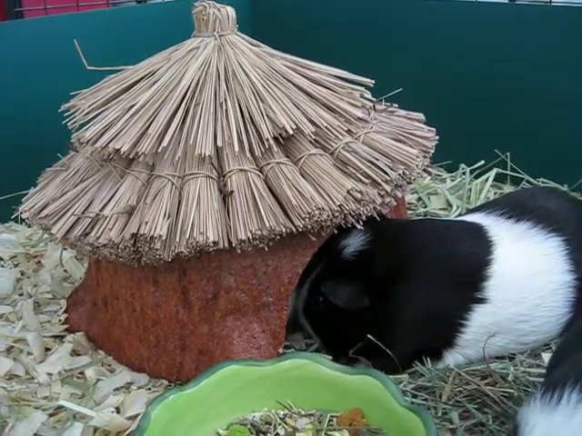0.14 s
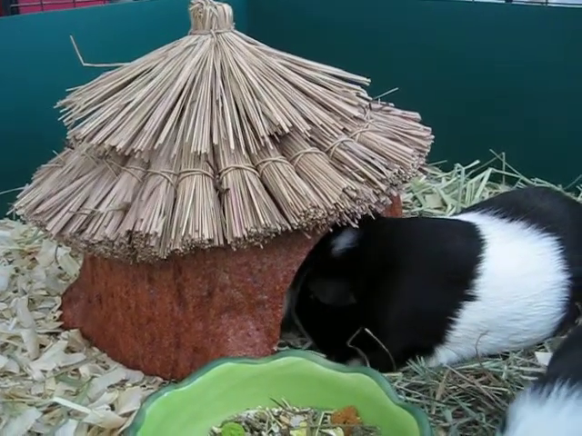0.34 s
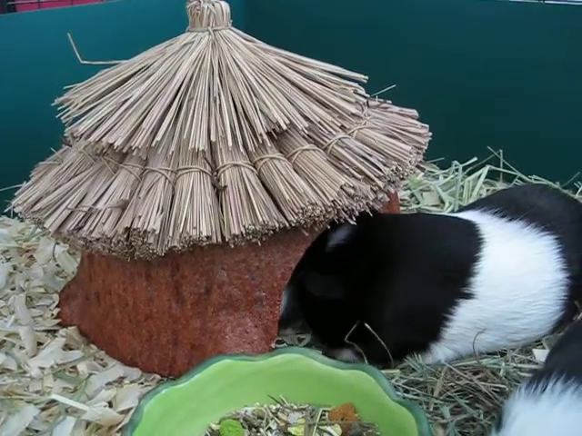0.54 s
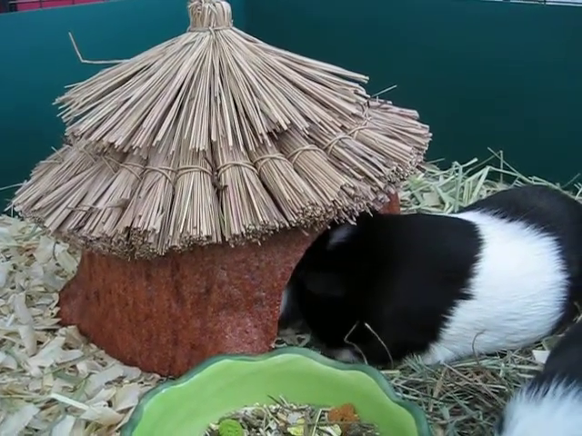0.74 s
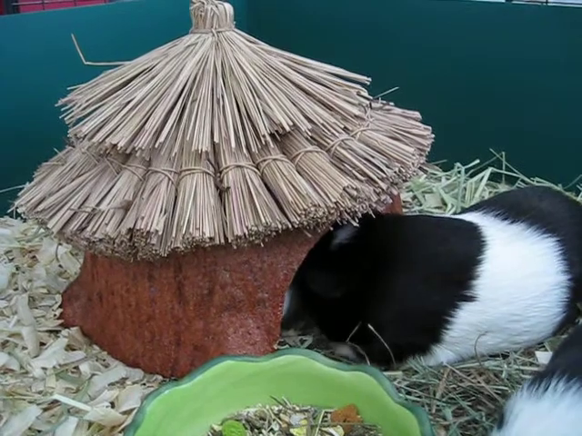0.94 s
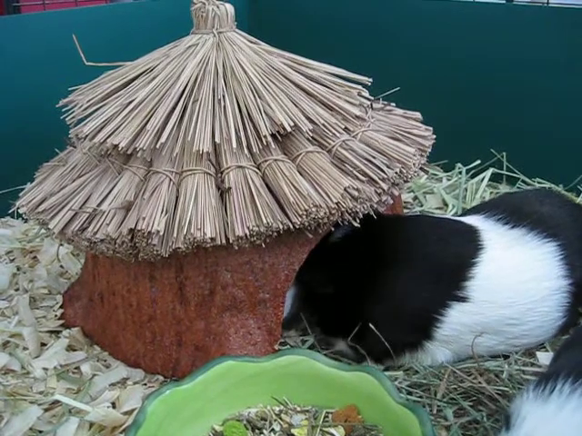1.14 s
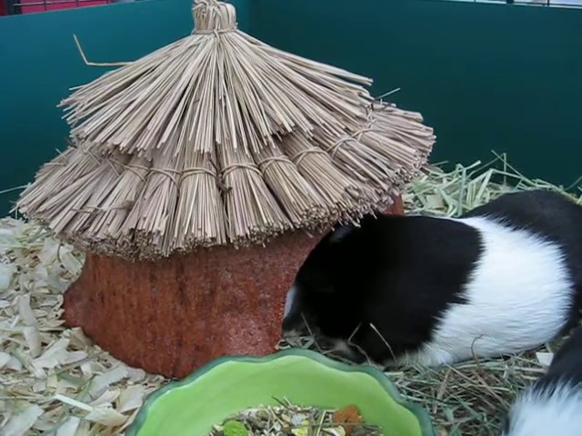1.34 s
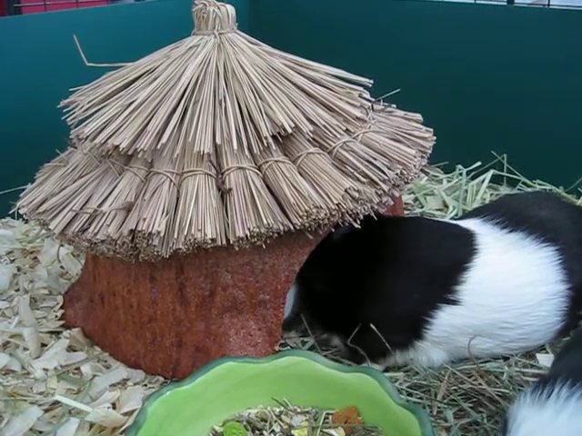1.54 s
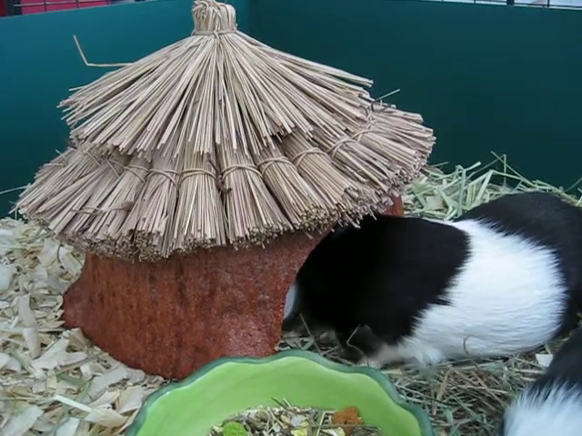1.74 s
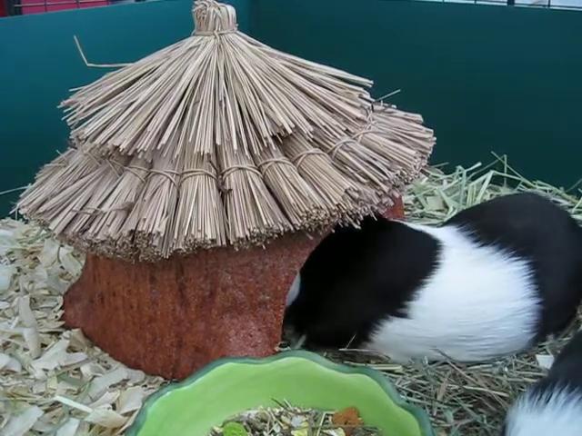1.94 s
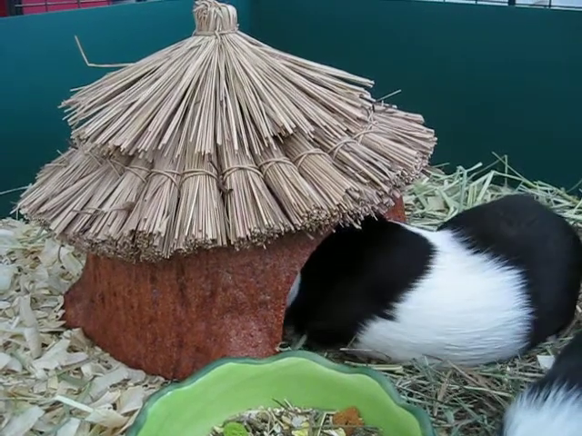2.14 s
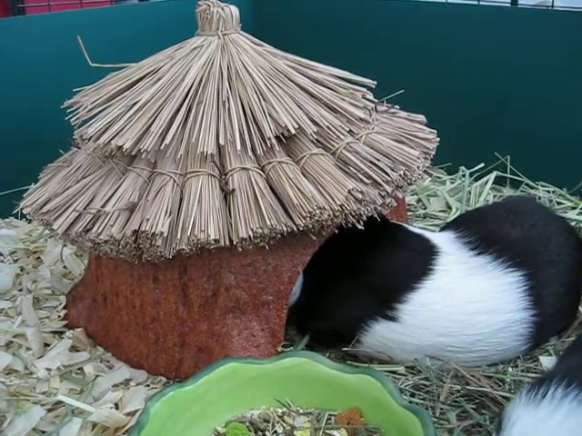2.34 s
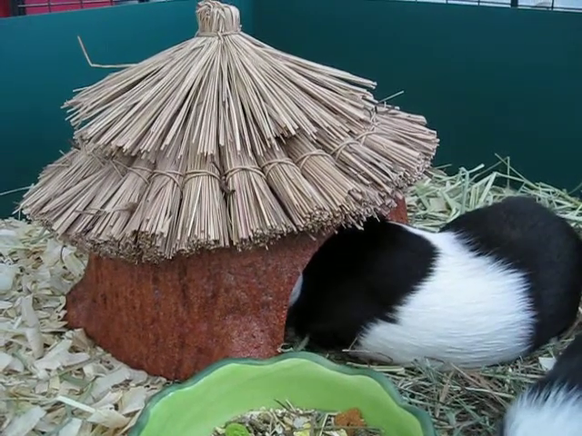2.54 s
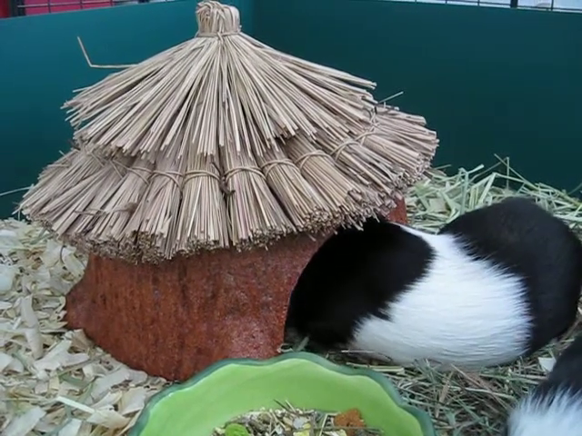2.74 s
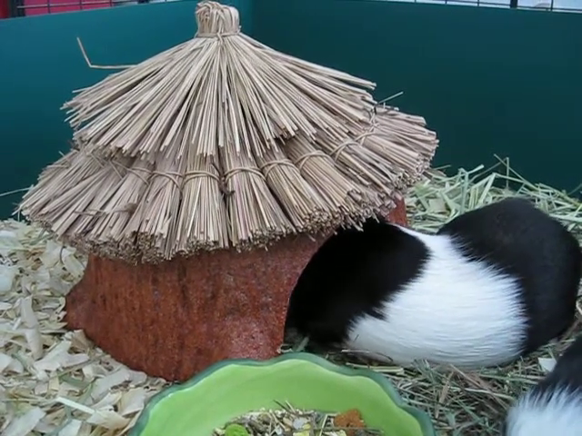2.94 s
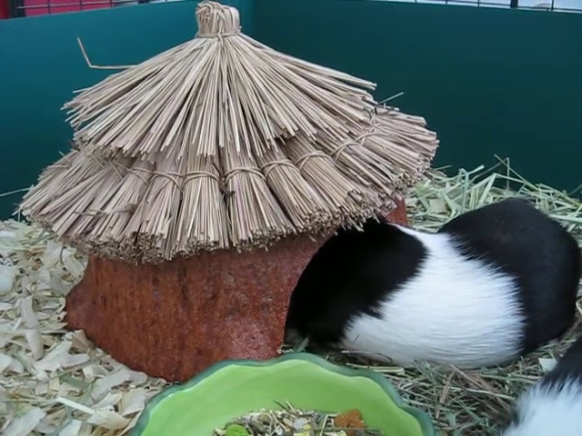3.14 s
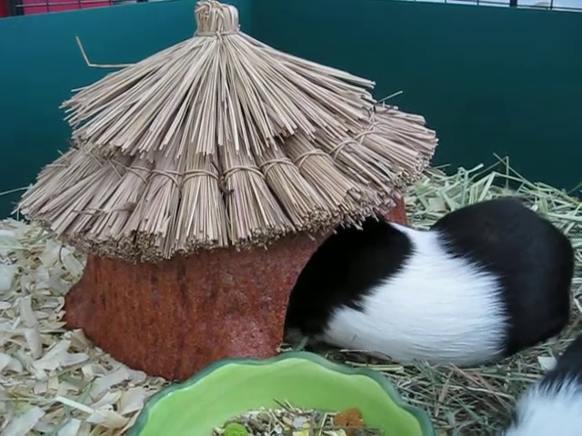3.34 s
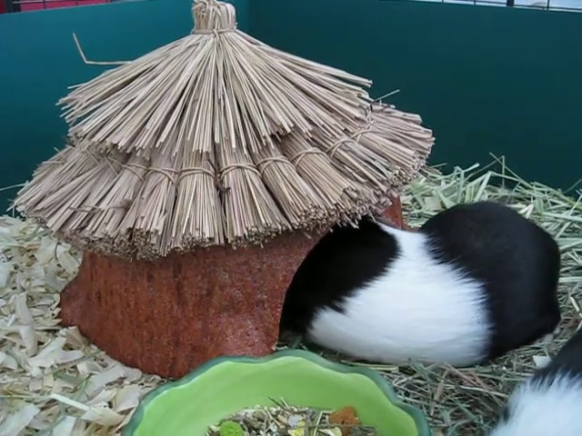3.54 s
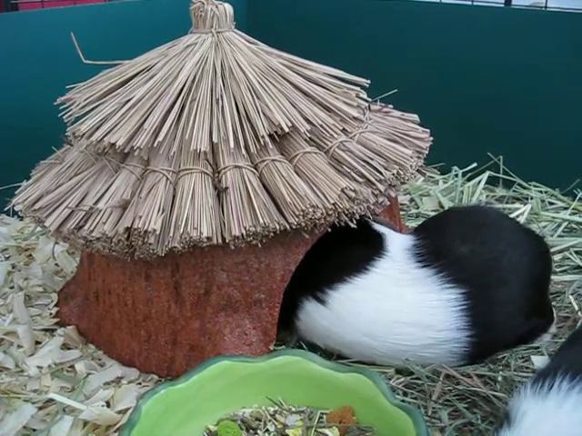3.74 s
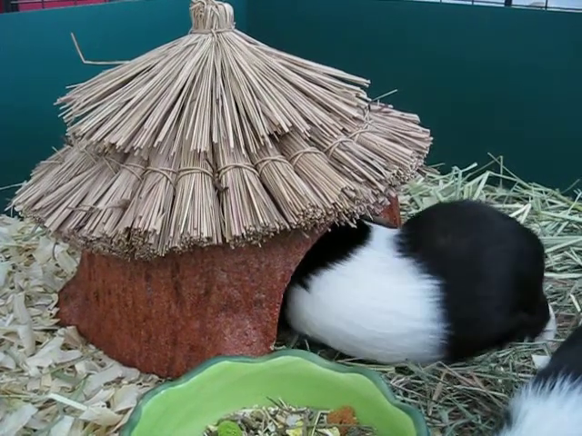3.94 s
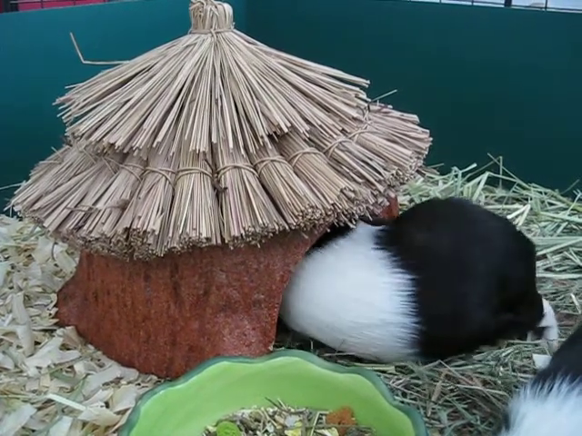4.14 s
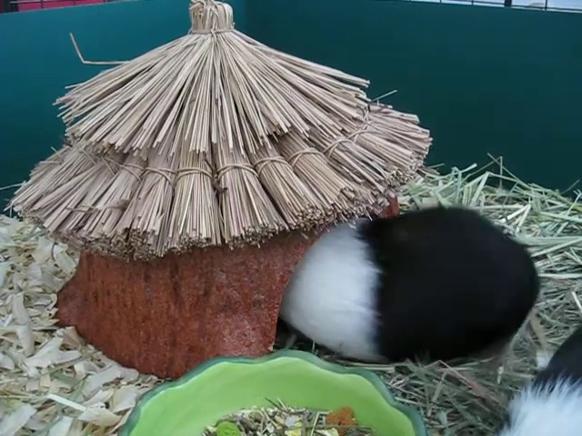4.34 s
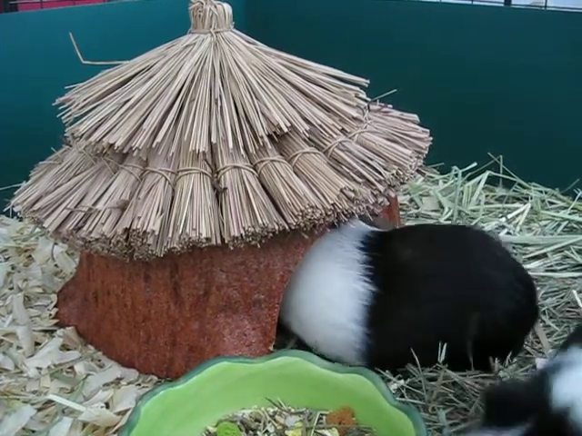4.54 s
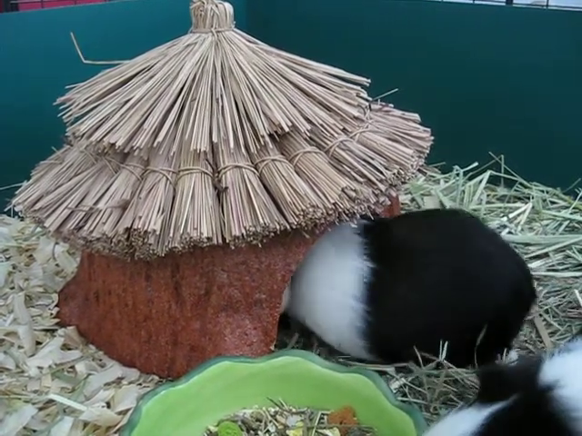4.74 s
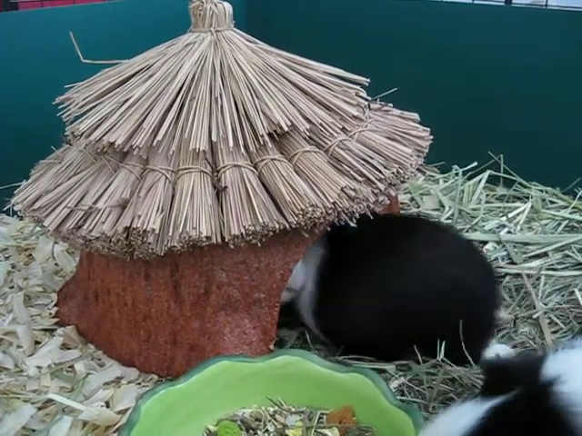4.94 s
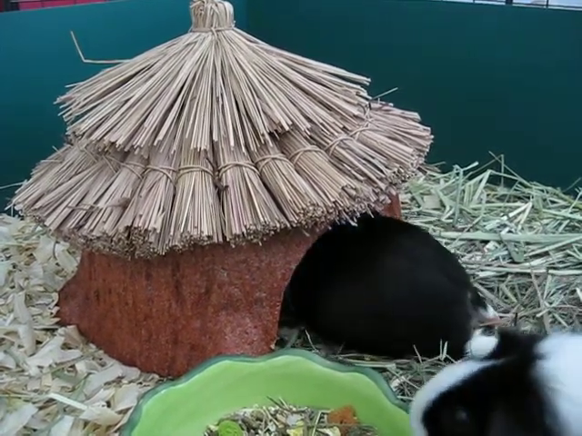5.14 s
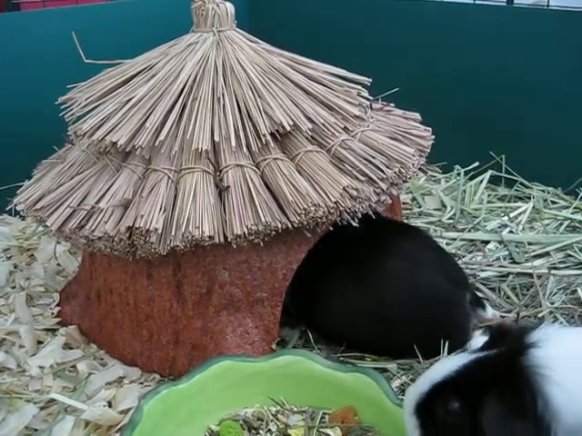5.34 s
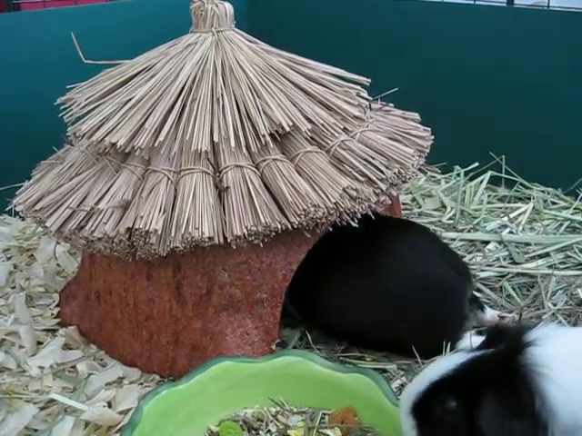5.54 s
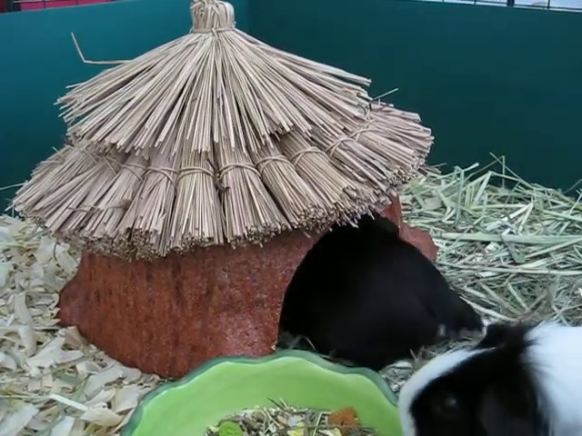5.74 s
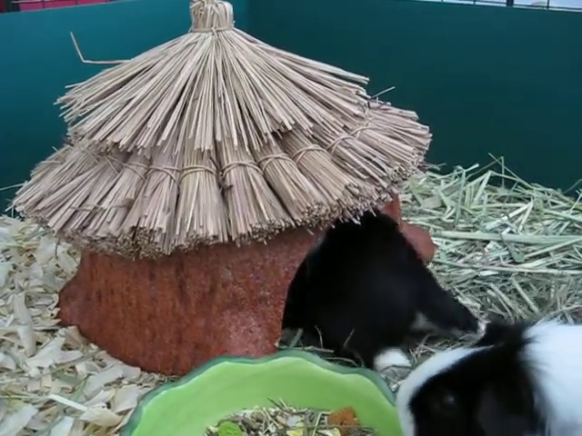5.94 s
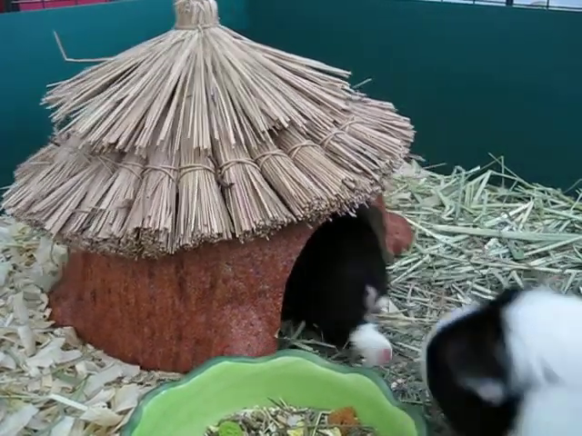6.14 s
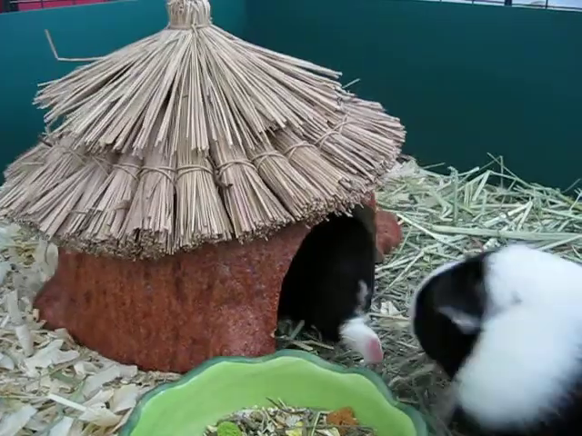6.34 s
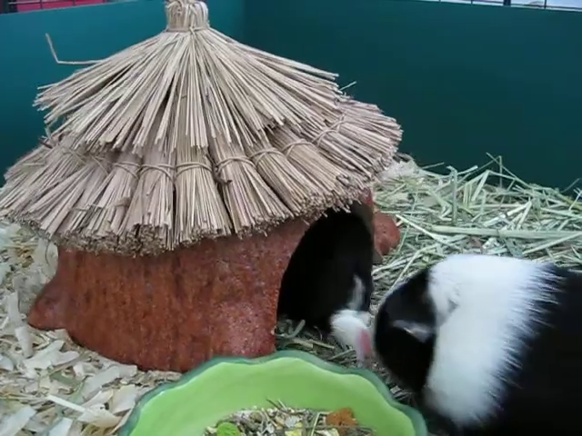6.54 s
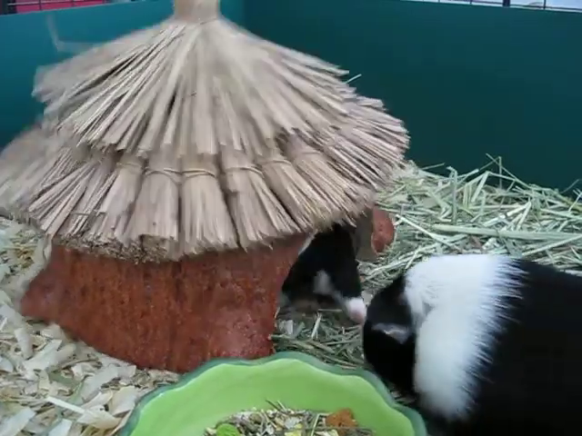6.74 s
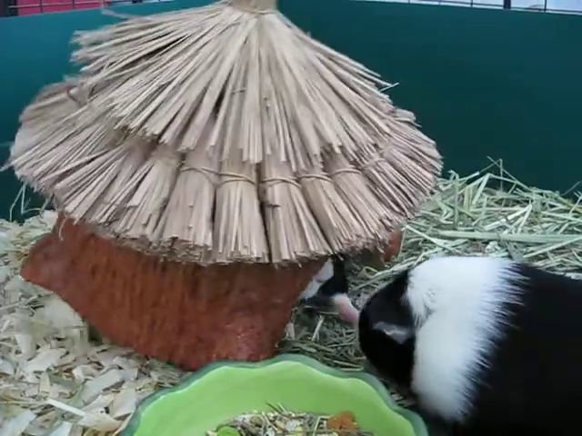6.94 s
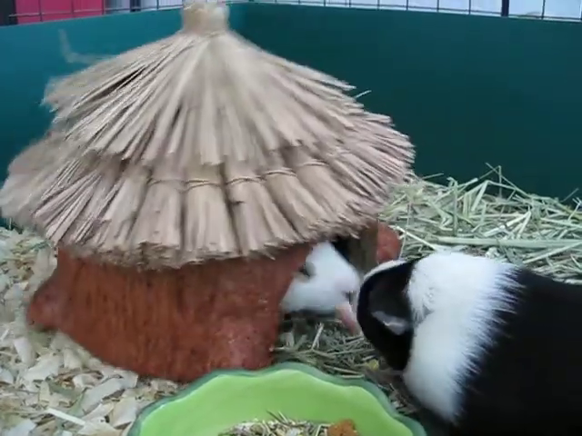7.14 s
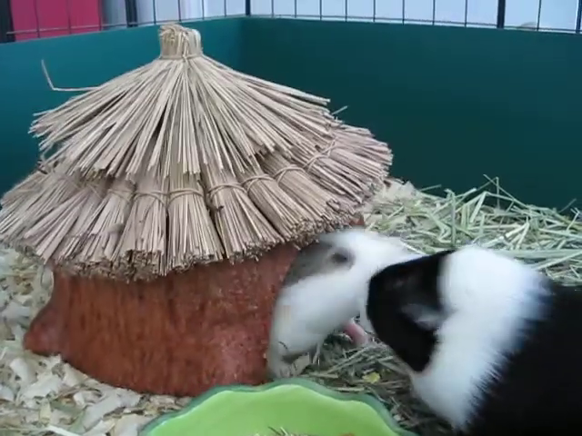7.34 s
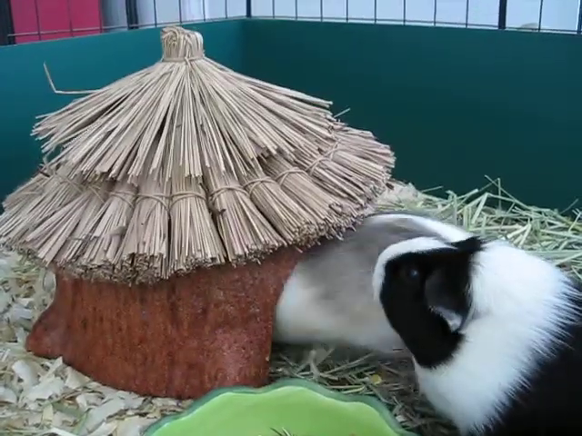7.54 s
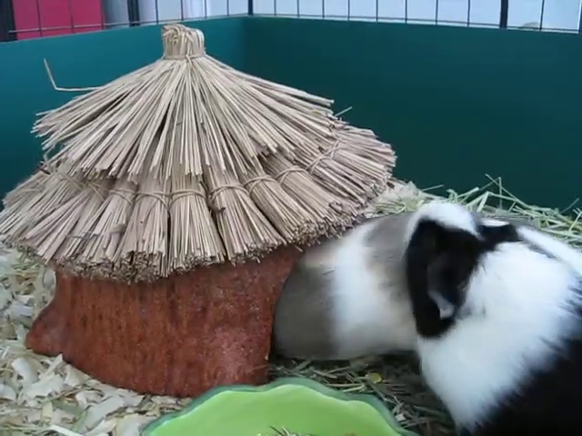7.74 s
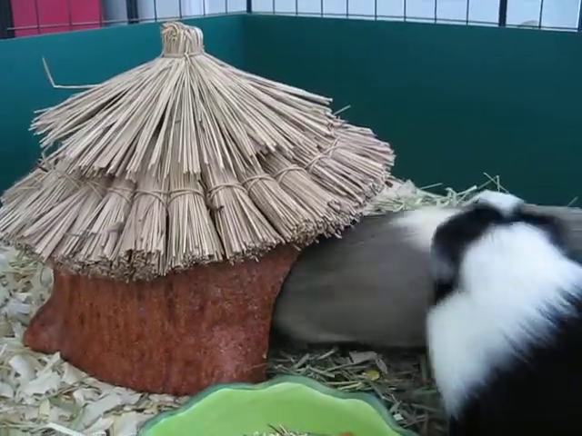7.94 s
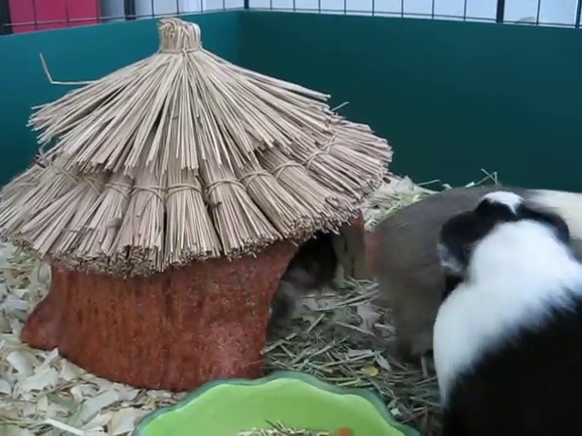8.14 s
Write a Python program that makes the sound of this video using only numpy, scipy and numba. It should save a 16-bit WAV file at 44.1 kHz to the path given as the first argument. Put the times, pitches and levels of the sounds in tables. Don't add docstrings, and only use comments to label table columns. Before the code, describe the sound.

Guinea pigs chut softly in dry hay, then burst into overlapping little wheeks, grunts and squeals as bedding crackles and snaps around a small hut.

```python
import sys
import numpy as np
from scipy import signal
from scipy.fft import rfft, irfft
from scipy.io import wavfile
from scipy.ndimage import uniform_filter1d
from numba import njit

SR = 44100
rng = np.random.default_rng(int(sys.argv[2]) if len(sys.argv) > 2 else 0)


def transcribe(signal):
    frames = np.atleast_2d(signal).T
    limited = np.clip(frames, -1, 1)
    pcm = np.round(limited * 32767).astype(np.int16)
    wavfile.write(sys.argv[1], SR, pcm)


def level_to_linear(level):
    exponent = np.asarray(level, float) / 20
    return 10 ** exponent


N = 366030


def colour(x, points):
    hz, db = np.transpose(points)
    bins = np.maximum(np.arange(N // 2 + 1) * SR / N, 1)
    gain_db = np.interp(np.log(bins), np.log(hz), db)
    y = irfft(rfft(x) * level_to_linear(gain_db), N)
    return y / np.std(y)


def walk(rate_hz):
    hold = int(SR / rate_hz)
    levels = rng.standard_normal(N // hold + 1)
    return uniform_filter1d(np.repeat(levels, hold), hold)[:N]


def high_pass(x, hz):
    return signal.sosfilt(signal.butter(2, hz, "high", fs=SR, output="sos"), x)


@njit
def rings(start, hz, t60_s, size, phase):
    out = np.zeros(N + SR)
    for k in range(len(start)):
        z = size[k] * np.exp(1j * phase[k])
        turn = np.exp(2j * np.pi * hz[k] / SR - np.log(1000) / (t60_s[k] * SR))
        for i in range(start[k], start[k] + int(t60_s[k] * SR)):
            out[i] += z.real
            z *= turn
    return out[:N]


# pitch_hz [Hz], density_db [dB per Hz]
ROOM_SPECTRUM = [(15, -42), (25, -11), (165, -5), (261, -1.5), (447, -6), (602, -2), (1060, -12),
                 (1280, -10), (1680, -15.5), (2870, -16), (6110, -21.5), (7790, -26.5), (9160, -36),
                 (15700, -30)]
ROOM_DB = -50.5


def room_hum():
    air = rng.standard_normal(N)
    drone = signal.lfilter(*signal.iirpeak(615, 14, SR), air)
    drone += 0.57 * signal.lfilter(*signal.iirpeak(925, 30, SR), air)
    tone = colour(rng.standard_normal(N), ROOM_SPECTRUM) + level_to_linear(-9.5) * drone / np.std(drone)
    swell_db = 0.79 * walk(2.96) + 1.06 * walk(15)
    return tone * level_to_linear(ROOM_DB - 1.5 + swell_db)


# start_s [s], level_db [peak dB], pitch_hz [Hz]
FLOOR_KNOCKS = [
    (4.329, -47, 245),
    (4.739, -50, 199),
    (5.429, -56, 250),
    (5.689, -51, 80.7),
    (6.74, -49, 187),
    (7.149, -48, 258),
    (7.599, -46, 250),
]


def floor_thumps():
    start_s, level_db, pitch_hz = np.transpose(FLOOR_KNOCKS)
    t60_s, phase = np.full(len(start_s), .11), np.full(len(start_s), -np.pi / 2)
    return rings((start_s * SR).astype(np.int64), pitch_hz, t60_s, level_to_linear(level_db), phase)


# start_s [s], crackle_db [dB], weight_db of bodies [dB]
RESTLESSNESS = [(0, -55.5, -7), (.5, -56.5, 2), (.72, -67, -5), (1.11, -56, -5), (1.5, -59.5, 0),
                (1.82, -49.5, -14), (1.9, -55, -3.5), (2.45, -60, 1), (3.3, -58, -8), (3.42, -64, -2.5),
                (4.1, -51.5, -3), (4.55, -59, 3), (5.15, -51.5, 6.5), (5.3, -60, 4), (6.3, -42, -1),
                (6.9, -45, -2.5), (7.7, -51.5, 4.5), (8.3, -44, 3)]
# start_s [s], crackle_db [dB], fade_s over 10 dB [s], weight_db of bodies [dB]
BEDDING_SHOVES = [(.002, -43, 0.14, -20), (.14, -47, .033, -6), (.55, -52.5, 0.1, -10), (.88, -51, 0.03, 2),
                  (1.57, -47.5, 0.03, -9), (2.4, -51.5, 0.08, -12), (2.54, -57.5, 0.14, -13.5),
                  (3.54, -49.5, 0.12, -13), (3.9, -42.5, 0.08, -25), (4.11, -43, 0.04, -7.5),
                  (4.339, -38, 0.09, -17), (4.89, -45.5, 0.15, -3), (5.041, -41.5, 0.05, -3),
                  (5.47, -46, 0.07, 4.5), (5.66, -38.5, 0.08, -15), (5.75, -41.5, 0.04, -9),
                  (5.901, -37, 0.08, -11), (6.045, -33.5, 0.25, -9), (6.38, -40, 0.14, -24),
                  (6.729, -36, 0.1052, -3), (6.83, -45.5, 0.08, 1), (7.165, -37, .09, -5),
                  (7.28, -40, 0.09, 2.5), (7.4, -38.5, .05, -7), (7.52, -43, 0.06, 2),
                  (8.25, -37.5, 0.05, 3), (7.78, -45, .06, -1.5), (7.93, -39, 0.15, -10),
                  (8.02, -34.5, 0.07, -18), (8.068, -28, 0.04, -22)]
# start_s [s], crackle_db [dB]
STALK_TUGS = [(.43, -51), (1.17, -54), (1.67, -50), (1.76, -51), (1.95, -54), (2.11, -59), (3.47, -54),
              (3.6, -53), (3.99, -52), (4.76, -46), (4.96, -49.5), (5.19, -52), (5.36, -50), (6.15, -38),
              (7.58, -40), (7.44, -45)]


def bedding_db(weight_share, spread):
    t = np.arange(0, N / SR, .002)
    start_s, crackle_db, weight_db = np.transpose(RESTLESSNESS)
    power = level_to_linear(np.interp(t, start_s, crackle_db + weight_share * weight_db)) ** 2
    tug_fade_s, tug_weight_db = 0.031, -8
    tugs = [(s, db, tug_fade_s, tug_weight_db) for s, db in STALK_TUGS]
    for s, db, fade_s, push_weight_db in BEDDING_SHOVES + tugs:
        away = np.maximum(t - s, (s - t) / 0.87) / (fade_s * spread)
        power += level_to_linear(db + weight_share * push_weight_db - 10 * away) ** 2
    return np.interp(np.arange(N) / SR, t, 10 * np.log10(power))


def crackle(count, low_hz, high_hz, cycles, scatter_db):
    when, pitch, size, phase = rng.random((count, 4)).T
    hz = low_hz + (high_hz - low_hz) * pitch
    size = level_to_linear(-scatter_db * np.log(size + .002))
    grains = rings((when * N).astype(np.int64), hz, cycles / hz, size, 2 * np.pi * phase)
    return grains / np.std(grains)


def snaps(rows, length_s, broad_db):
    splinters = 24
    start_s, level_db, pitch_hz = np.repeat(np.transpose(rows), splinters, axis=1)
    order = np.arange(len(start_s)) % splinters
    pitch, phase = rng.random((len(start_s), 2)).T
    late = (order / splinters) ** 3
    broad = order % 2
    near_hz = np.minimum(pitch_hz * 2 ** (.5 * (pitch - .5)), 17000)
    ring_hz = np.where(broad, 2500 + 13500 * pitch, near_hz)
    size = level_to_linear(level_db - 4.5 + broad * broad_db - 9.8 * late ** 0.73)
    delay_s = .0008
    start = ((start_s + delay_s + late * length_s) * SR).astype(np.int64)
    return rings(start, ring_hz, 9 / ring_hz, size, 2 * np.pi * phase)


# pitch_hz [Hz], density_db [dB per Hz]
HAY_SPECTRUM = [(59, -41), (100, -17.5), (1210, -10), (2550, -4), (2890, -5), (6740, -5), (7810, -9),
                (9450, -5), (15700, -3.5)]


def hay_rustle():
    bursts = level_to_linear(1.78 * walk(45) + 1.66 * walk(200))
    swish = 0.91 * rng.standard_normal(N)
    bright = crackle(count=60000, low_hz=2470, high_hz=15600, cycles=4.3, scatter_db=2.0) + swish
    when, size, pitch = rng.random((900, 3)).T
    tick_rows = np.c_[when * N / SR, 14 * size ** 2, 5000 + 10000 * pitch ** .6]
    ticks = snaps(tick_rows, length_s=.0015, broad_db=-8)
    dull = high_pass(crackle(count=25000, low_hz=408, high_hz=3650, cycles=4.2, scatter_db=3.0), 480)
    push_db = bedding_db(weight_share=0, spread=0.87)
    body_db = bedding_db(weight_share=0.96, spread=1.05)
    mix = level_to_linear(push_db - 0.24) * colour(bright, HAY_SPECTRUM) + dull * level_to_linear(body_db - 2.0)
    return mix * bursts + ticks * level_to_linear(.7 * push_db - 11)


# start_s [s], level_db [peak dB], pitch_hz [Hz]
STALK_FLICKS = [(0.2139, -36, 14700), (0.4135, -39, 6420), (0.595, -40, 5860), (0.8754, -39, 4080),
                (1.0021, -44, 4270), (1.0375, -41, 5170), (1.0929, -43, 5430), (1.1613, -35, 5470),
                (1.6317, -36, 13700), (1.7195, -38, 10300), (1.7614, -37, 11600), (1.7814, -37, 11100),
                (1.8512, -37, 4090), (2.1276, -42, 4480), (2.1834, -41, 6200), (2.2872, -40, 5510),
                (2.3241, -40, 5730), (2.4024, -35, 14900), (2.5696, -44, 5150), (2.6728, -41, 13800),
                (2.6993, -41, 6250), (3.4795, -35, 12100), (3.5144, -36, 13900), (3.6316, -36, 14500),
                (3.8182, -36, 5770), (4.2368, -34, 6210), (4.2757, -34, 5730), (4.4697, -42, 5220),
                (4.5256, -41, 4980), (5.1876, -36, 4290), (5.3098, -43, 6260), (5.4021, -40, 6350),
                (5.5413, -36, 4810), (5.6246, -34, 5550), (5.6411, -28, 13700), (5.8406, -35, 4120),
                (6.3051, -28, 13000), (6.4857, -31, 4290), (7.0983, -28, 4210), (7.4026, -26, 14600),
                (7.7598, -31, 4980),
                (.008, -30, 11500), (.112, -36, 11000), (.123, -36, 8000), (.132, -31, 9000),
               (.142, -29, 13000), (.186, -37, 10500), (.222, -36, 14000), (1.572, -30, 13500),
               (1.5735, -29, 14800), (1.635, -36, 14000), (1.667, -31, 13500), (1.673, -32, 12500),
               (1.673, -35, 6500), (1.676, -35, 12500), (2.406, -36, 13000), (3.5219, -36, 14400),
               (3.9055, -35, 4000), (3.936, -37, 3720), (4.117, -27, 13500), (4.33, -29, 13000),
               (4.364, -29, 13500), (5.0489, -30, 12700), (5.914, -29, 9500), (5.943, -25, 12000),
               (6.075, -25, 6500), (6.141, -26, 10500), (6.264, -26, 8800), (6.389, -28, 13500),
               (7.275, -19, 13000), (7.288, -28, 12000), (7.384, -21, 11500), (7.9204, -27, 10000),
               (8.2312, -28, 11700), (8.2766, -29, 11300)]


def stalk_flicks():
    return snaps(STALK_FLICKS, length_s=.002, broad_db=-6)


# start_s [s], level_db [peak dB], pitch_hz [Hz]
THIN_TIPS = [(0.0278, -23, 12200), (0.1391, -22, 15400), (0.3474, -36, 15100), (0.5496, -29, 14600),
             (1.1318, -36, 10900), (1.5654, -26, 14700), (1.6671, -38, 13500), (2.1086, -39, 15400),
             (2.5466, -34, 14100), (3.5882, -36, 12000), (4.1081, -29, 14200), (4.6164, -36, 12400),
             (5.6057, -36, 14200), (5.7104, -32, 14300), (5.7354, -27, 13100), (6.0072, -27, 12000),
             (6.1499, -16, 14800), (6.2128, -27, 11000), (6.3395, -28, 14300), (6.3564, -14, 12900),
             (6.564, -24, 10900), (6.83, -24, 10900), (7.147, -16, 13300), (7.1648, -16.5, 8950),
             (7.2714, -26, 14600), (7.2714, -17, 13800), (7.3067, -22, 10900), (7.3825, -20.5, 10600),
             (8.0611, -16, 13800), (8.1184, -23, 12800)]


def tip_snaps():
    return level_to_linear(4.5) * high_pass(snaps(THIN_TIPS, length_s=.003, broad_db=-11.5), 4250)


# start_s [s], level_db [peak dB], pitch_hz [Hz]
THICK_STALKS = [(0.1042, -34, 6190), (0.1396, -40, 4970), (0.139, -35, 5600), (0.3471, -44, 5090),
                (0.5506, -33.5, 6070), (1.5668, -36, 6260), (1.6671, -31.5, 6800), (2.5481, -37, 5340),
                (2.7691, -39, 6000), (3.589, -38.5, 5210), (4.3023, -33, 5370), (5.0365, -34, 5440),
                (5.6052, -36, 6890), (6.1075, -25, 6910), (6.1499, -28, 4870), (7.1452, -41, 4500),
                (7.146, -30, 4820), (7.1646, -26, 7020), (7.272, -28, 5220), (7.3063, -30, 5400),
                (7.3811, -38, 4980), (7.4021, -38, 5710), (7.5702, -37, 4820), (7.9264, -32, 4550),
                (8.0611, -23, 5380), (8.2345, -37, 4580)]
# start_s [s], level_db [peak dB], pitch_hz [Hz]
HAY_CRUNCHES = [(0.1385, -29, 3280), (0.474, -34, 3280), (0.7951, -36, 3600), (0.9393, -41, 3260),
                (1.1624, -39, 3370), (1.169, -33.5, 3050), (1.1947, -37, 3260), (1.6667, -35, 3240),
                (1.7574, -35, 3220), (2.0764, -42, 3640), (2.5471, -50, 4860), (3.1554, -37, 3450),
                (3.9882, -34, 2740), (4.0711, -33, 2710), (4.1081, -33, 2700), (5.13, -31, 3240),
                (5.6052, -39, 3620), (5.9735, -23, 3010), (6.1497, -32, 2710), (7.2342, -27.5, 3020),
                (7.271, -27, 2720), (7.3058, -17.5, 3860), (7.5303, -32, 2210), (8.0167, -18.5, 2480),
                (8.0597, -23, 4590), (8.2355, -23, 2600)]


def stalk_snaps():
    stalks = level_to_linear(4.5) * snaps(THICK_STALKS, length_s=.0036, broad_db=-11.5)
    return stalks + snaps(HAY_CRUNCHES, length_s=.007, broad_db=-4)


def calls(rows, overtones_db, rough, flutter_db):
    throat_hz, throat_width_hz, throat_db = 2480, 620, 9
    out, wobble, flutter = np.zeros(N + SR), walk(150), walk(110)
    for start_s, length_s, start_hz, middle_hz, end_hz, level_db in rows:
        i, u = int(start_s * SR), np.linspace(0, 1, int(length_s * SR))
        hz = start_hz * (1 - u) * (1 - 2 * u) + 4 * middle_hz * u * (1 - u) + end_hz * u * (2 * u - 1)
        span = np.arange(i, i + len(u)) % N
        phase = 2 * np.pi * np.cumsum(hz * (1 + rough * wobble[span])) / SR
        tone = np.sin(phase)
        for k, overtone_db in enumerate(overtones_db, start=2):
            in_throat = np.exp(-((k * hz - throat_hz) / throat_width_hz) ** 2)
            thin_db = 5.5 * (k - 1 - in_throat) * abs(np.log2(end_hz / start_hz))
            tone += level_to_linear(overtone_db + throat_db * in_throat - thin_db) * np.sin(k * phase)
        attack = np.minimum(u * length_s / 0.002, 1)
        shape = attack * np.sin(np.pi * u ** 0.66) ** 0.3
        out[i:i + len(u)] += tone * shape * level_to_linear(level_db + 2.5 + flutter_db * flutter[span])
    return out[:N]


def glides(rows):
    level_off_s = .13
    return [(s, length_s, start_hz, start_hz + (end_hz - start_hz) * min(length_s / level_off_s, 1), end_hz, db)
            for s, length_s, start_hz, end_hz, db in rows]


def arches(rows):
    scoop_hz, sag_hz = 85, 25
    return [(s, length_s, top_hz - scoop_hz, top_hz, top_hz - sag_hz, db) for s, length_s, top_hz, db in rows]


# start_s [s], length_s [s], start_hz [Hz], end_hz [Hz], level_db [dB]
ROUND_WHISTLES = [(7.776, 0.022, 1200, 1030, -41), (5.429, 0.044, 770, 1000, -37),
                  (5.659, 0.056, 755, 1040, -38.5), (6.245, 0.014, 310, 300, -36),
                  (6.469, 0.045, 260, 350, -40.5), (6.48, .03, 830, 640, -40), (6.435, .025, 300, 300, -46),
                  (5.966, .04, 1820, 1690, -42), (6.238, .016, 850, 980, -45),
                  (6.779, 0.058, 590, 910, -40), (6.794, .022, 1080, 1420, -38),
                  (6.768, .012, 290, 310, -43), (6.993, 0.022, 950, 1220, -43),
                  (6.999, 0.056, 670, 823, -37), (7.065, .014, 720, 700, -43), (7.072, .018, 290, 270, -46),
                  (7.115, 0.096, 1670, 1530, -36.5), (7.204, 0.018, 1520, 1190, -37),
                  (7.222, .025, 1500, 1520, -46), (7.43, .02, 750, 1200, -44), (7.39, .03, 1070, 1100, -44),
                  (7.36, .022, 690, 790, -39), (7.345, .018, 1000, 1300, -45),
                  (7.518, 0.04, 691, 740, -38.5), (7.555, 0.024, 720, 1080, -39),
                  (7.535, .026, 1150, 1040, -40), (7.599, 0.052, 411, 772, -38),
                  (7.7, 0.034, 740, 1360, -40), (7.767, .032, 290, 590, -42), (7.794, .04, 1027, 1300, -38),
                  (7.813, 0.042, 600, 900, -39.5), (7.846, .012, 330, 330, -44),
                  (7.88, .044, 740, 665, -38), (7.92, .018, 690, 920, -43), (7.911, 0.017, 270, 330, -39),
                  (7.972, 0.022, 240, 290, -42), (8.046, .017, 250, 330, -40), (8.198, .02, 790, 1280, -41)]
# start_s [s], length_s [s], top_hz [Hz], level_db [dB]
ROUND_CHUTS = [(.636, 0.036, 597, -54), (1.917, 0.027, 656, -52), (2.169, 0.019, 690, -46.5),
               (2.487, .031, 672, -44.5), (2.571, 0.037, 690, -57), (2.827, 0.02, 725, -41.5),
               (4.337, 0.019, 763, -38.5), (4.423, .025, 1280, -51.5), (4.731, .026, 755, -40.5),
               (4.825, 0.024, 1167, -49), (5.975, 0.036, 690, -38), (6.282, .018, 690, -41),
               (6.615, 0.012, 696, -43), (6.836, 0.022, 1061, -42), (7.081, .024, 1637, -39),
               (7.117, .032, 830, -39.5), (7.525, .016, 1150, -34), (7.381, 0.014, 1064, -34)]
ROUND_HARMONICS = [-24, -27.5, -31]


def round_calls():
    rows = glides(ROUND_WHISTLES) + arches(ROUND_CHUTS)
    return calls(rows, ROUND_HARMONICS, rough=.011, flutter_db=1.8)


# start_s [s], length_s [s], start_hz [Hz], end_hz [Hz], level_db [dB]
BUZZING_SQUEALS = [
    (6.776, .04, 870, 1500, -41),
    (7.299, 0.066, 620, 685, -36),
    (7.462, 0.056, 535, 680, -36.5),
    (7.696, 0.03, 330, 570, -38),
    (8.234, .016, 450, 430, -41),
    (8.268, .03, 460, 450, -46),
]
BUZZY_HARMONICS = [-6, -14, -25]


def squeals():
    return calls(glides(BUZZING_SQUEALS), BUZZY_HARMONICS, rough=.012, flutter_db=1.8)


# start_s [s], length_s [s], start_hz [Hz], end_hz [Hz], level_db [dB]
REEDY_WHEEKS = [(5.013, 0.044, 954, 1910, -41.5), (5.388, 0.074, 620, 1430, -37),
                (5.51, 0.074, 420, 1440, -41.5), (5.693, 0.053, 450, 1090, -38),
                (5.742, 0.04, 1050, 2450, -38.5), (5.888, .068, 470, 1250, -39),
                (5.952, 0.02, 1250, 1750, -44), (6.016, .036, 1540, 1330, -38),
                (6.148, 0.056, 590, 790, -41), (6.2, .022, 800, 790, -40), (6.218, 0.026, 780, 620, -37.5),
                (6.306, 0.016, 290, 350, -40), (6.505, 0.04, 630, 1330, -36),
                (6.712, 0.026, 1000, 1800, -41), (6.961, 0.046, 837, 837, -37),
                (7.048, .046, 853, 1630, -39), (7.372, 0.02, 880, 1220, -39),
                (8.119, 0.017, 850, 1500, -34), (8.179, 0.017, 250, 390, -38),
                (7.5, .036, 860, 1150, -38.5), (6.394, 0.04, 790, 757, -38.5)]
# start_s [s], length_s [s], top_hz [Hz], level_db [dB]
REEDY_CLUCKS = [(1.83, 0.042, 778, -45.5), (3.113, 0.024, 780, -42), (3.354, 0.029, 773, -41),
                (3.617, .024, 721, -41.5), (4.1, 0.016, 740, -42), (6.447, 0.015, 1140, -35.5),
                (8.099, 0.026, 790, -38), (7.976, .021, 798, -37), (8.171, .032, 800, -39),
                (8.283, 0.0165, 450, -39), (8.287, .012, 1600, -41)]
REEDY_HARMONICS = [-11, -19, -29]


def reedy_calls():
    rows = glides(REEDY_WHEEKS) + arches(REEDY_CLUCKS)
    return calls(rows, REEDY_HARMONICS, rough=.009, flutter_db=1.5)


def pen_tail(near):
    t60_s, dull_hz, level_db = 0.093, 2540, -10.5
    t = np.arange(SR // 8) / SR
    tail = rng.standard_normal(len(t)) * level_to_linear(-60 * t / t60_s) * (t > .003)
    tail = signal.sosfilt(signal.butter(1, dull_hz, fs=SR, output="sos"), tail)
    return level_to_linear(level_db) * signal.oaconvolve(near, tail / np.linalg.norm(tail))[:N]


def scene():
    background = room_hum() + hay_rustle()
    voices = round_calls() + squeals() + reedy_calls()
    near = floor_thumps() + stalk_flicks() + tip_snaps() + stalk_snaps() + voices
    return (near + pen_tail(near) + background)[None]


def low_pass(x):
    return signal.sosfilt(signal.butter(12, 16830, fs=SR, output="sos"), x)


# pitch_hz [Hz], gain_db [dB]
TOP_CUT = [(15740, 0), (15850, -28), (15950, -44), (16150, -50), (16300, -70)]


def record(dry):
    notch_hz, notch_width_hz = 7881, 750
    hz = np.arange(N // 2 + 1) * SR / N
    off = (hz - notch_hz) / notch_width_hz
    notch = off / (off - 1j)
    top = level_to_linear(np.interp(hz, *np.transpose(TOP_CUT)))
    mix = irfft(rfft(dry) * notch * top)
    return low_pass(mix)


dry = scene()
out = record(dry)
transcribe(out)
```